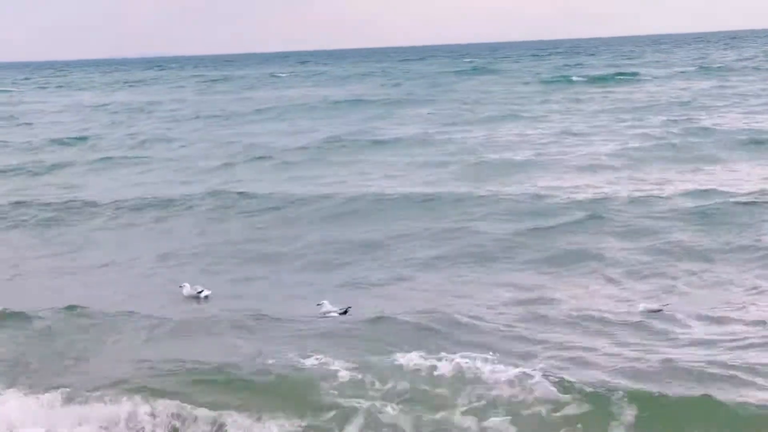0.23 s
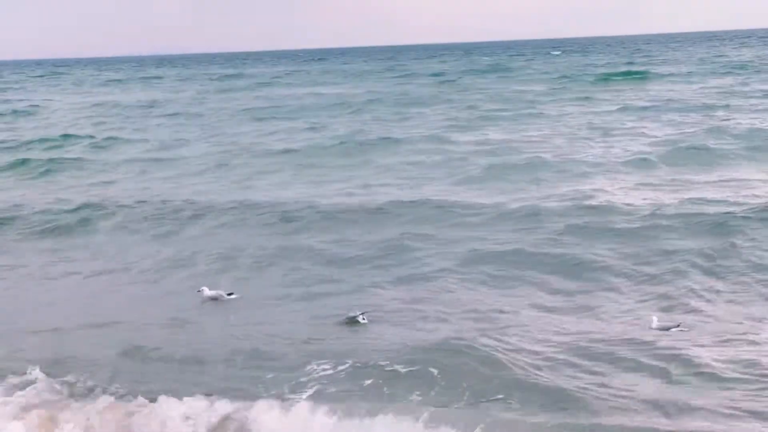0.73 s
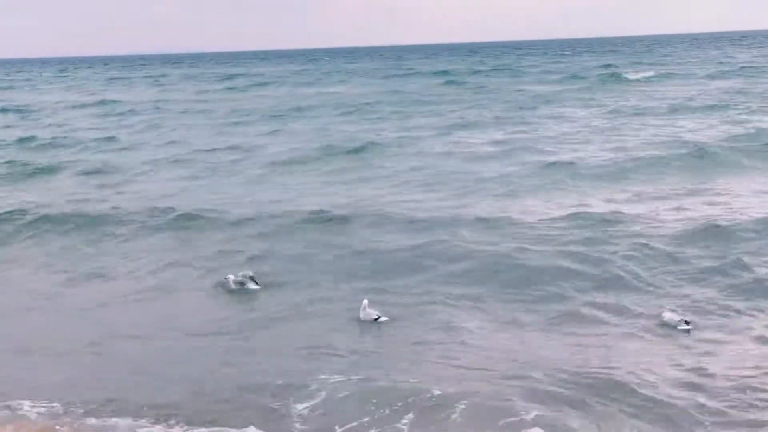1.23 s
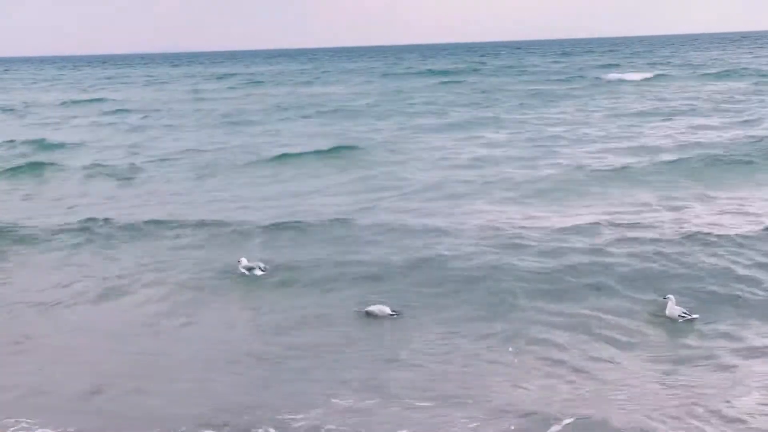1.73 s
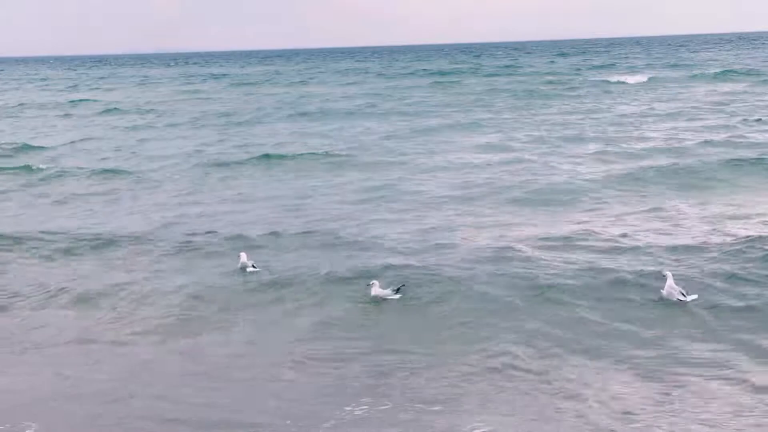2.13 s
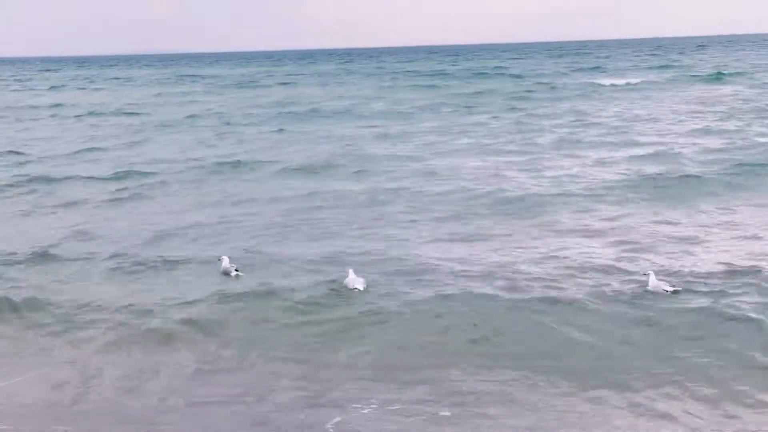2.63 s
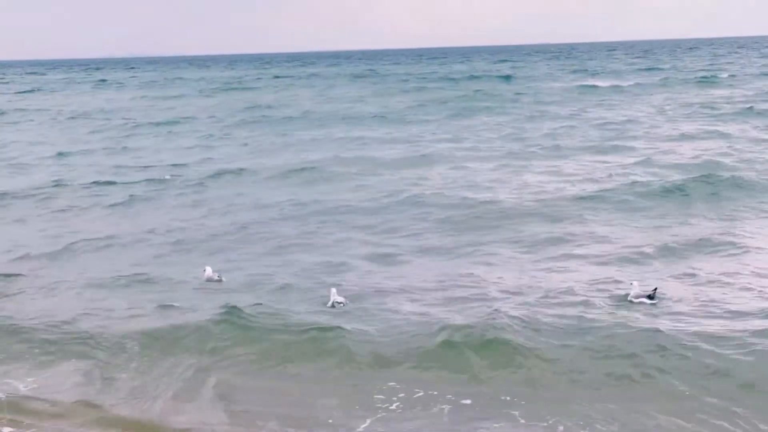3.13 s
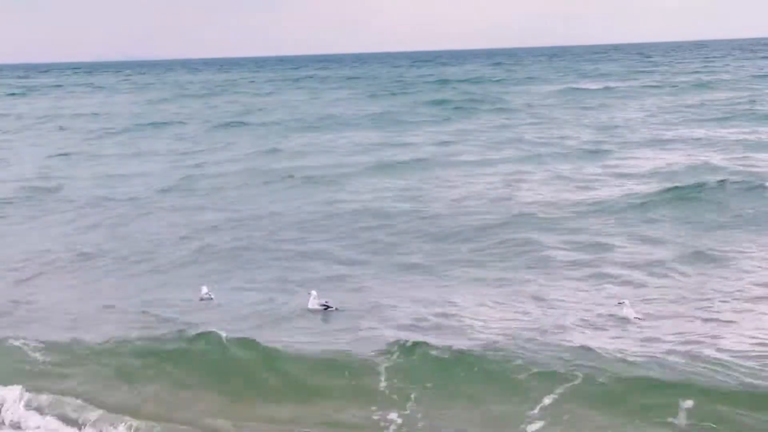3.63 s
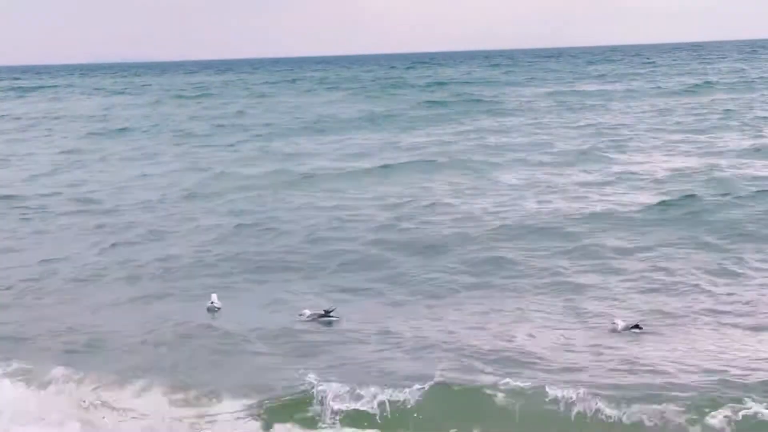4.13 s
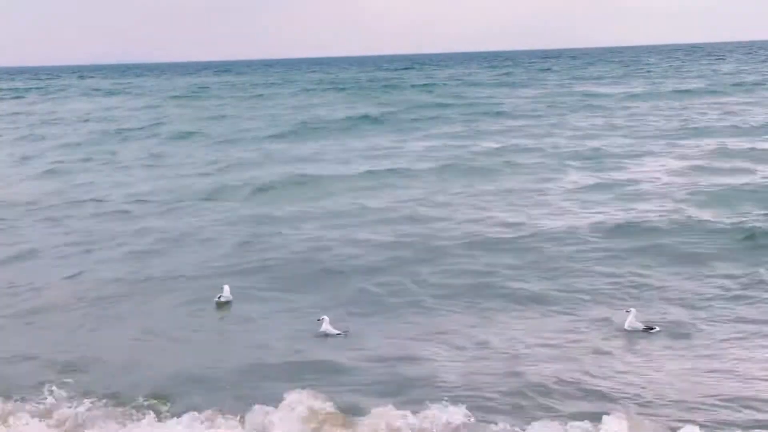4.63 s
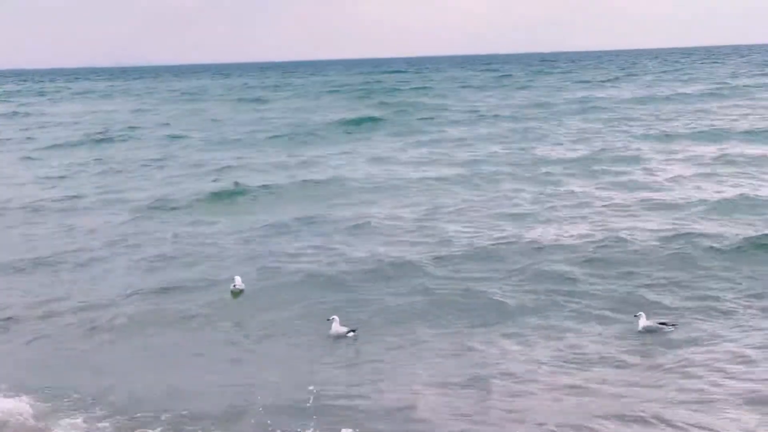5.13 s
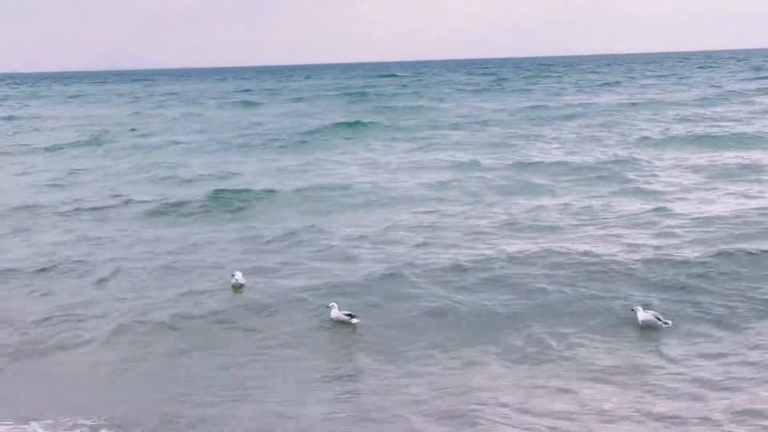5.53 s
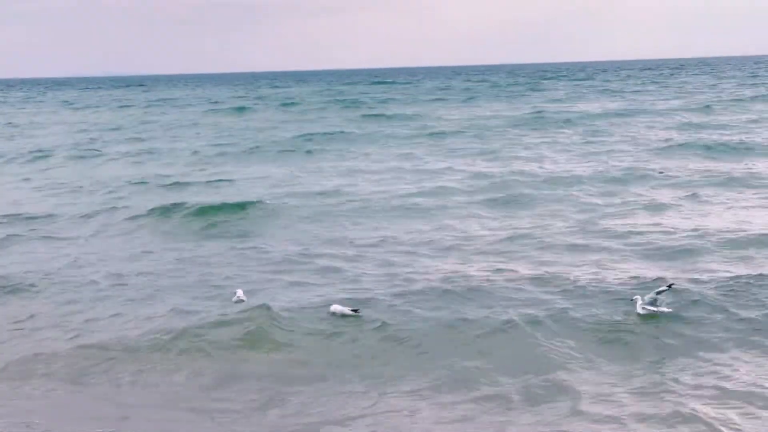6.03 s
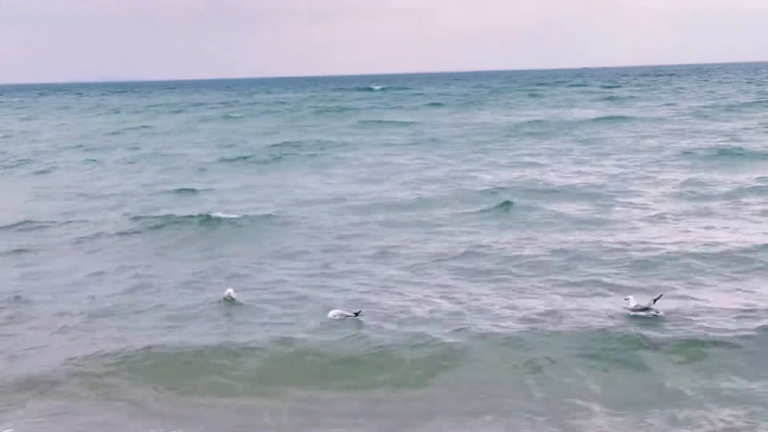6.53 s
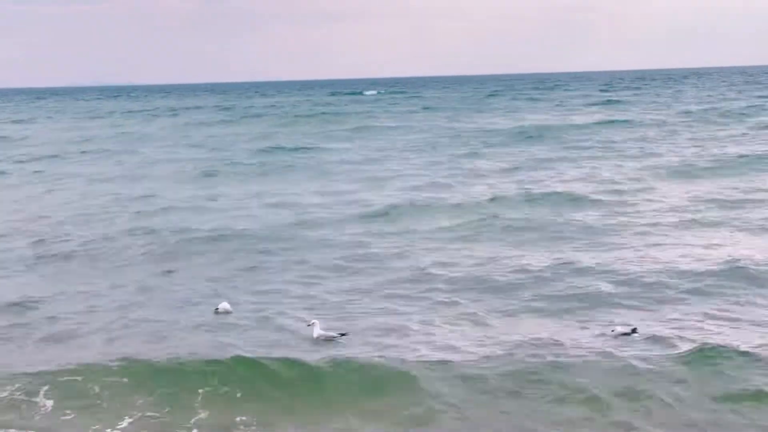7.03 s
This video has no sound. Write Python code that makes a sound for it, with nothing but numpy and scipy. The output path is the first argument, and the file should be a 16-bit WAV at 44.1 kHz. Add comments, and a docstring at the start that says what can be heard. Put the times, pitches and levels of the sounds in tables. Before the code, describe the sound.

On an open beach, gentle surf and faint wind open alone for nearly two seconds. Several gulls then burst into close, overlapping squabbling: nasal barks, rough rasps and thin whistles, loudest around three to four and a half seconds. A long, shrill double-pitched call follows, then scattered cries. Two small waves swell and fizz out underneath. The calls stop and little water slaps finish. Outdoor handheld stereo, dry, with slight low wind buffets.

```python
"""On a beach, gulls squabble close by while two small waves break and wash out.
Gull voices jump between nasal cries (harmonics under a beak resonance), thin near-pure whistles and rasps
(uneven pulses ringing a tight throat); one long call sounds two coupled notes at once.
Surf is banded noise with bursting bubbles, and slaps at the shore are ringing air pockets.
A light wind, low filtered noise, buffets the two microphone ports."""
import sys
import numpy as np
from scipy import signal
from scipy.fft import rfft, irfft
from scipy.io import wavfile
from scipy.ndimage import uniform_filter1d, minimum_filter1d, map_coordinates

SR = 44100
rng = np.random.default_rng(int(sys.argv[2]) if len(sys.argv) > 2 else 0)


def store_pcm(level_fs):
    """Save levels as 16-bit WAV."""
    pcm = np.round(np.clip(level_fs, -1, 1) * 32767).astype(np.int16)
    wavfile.write(sys.argv[1], SR, np.atleast_2d(pcm).T)


N = 321048
T = np.arange(N) / SR
FREQS = np.fft.rfftfreq(N, 1 / SR)


def undb(db):
    """Decibel law: level to amplitude gain."""
    return 10 ** (np.asarray(db) / 20)


def unit(x):
    """Normalisation to rms 1."""
    return x / np.sqrt(np.mean(x ** 2))


def shape(points, hz):
    """Spectral envelope: gain interpolated in dB over log frequency."""
    f, db = np.transpose(points)
    return undb(np.interp(np.log(np.maximum(hz, 1)), np.log(f), db))


def colour(x, points):
    """Linear filtering: the spectrum is multiplied by an envelope."""
    return irfft(rfft(x) * shape(points, FREQS), N)


def curves(table):
    """Interpolation: each column after the first, drawn as straight lines over time."""
    s, *columns = np.transpose(table)
    return [np.interp(T, s, column) for column in columns]


def walk(rate, size=N):
    """Smooth random wander of spread near 1, through `rate` random knots per second."""
    knots = rng.standard_normal(int(size / SR * rate) + 4)
    return map_coordinates(knots, [1 + np.arange(size) / SR * rate], order=2, mode="nearest")


def stereo_noise(side):
    """Partial coherence: two channels share a common noise and an opposed one."""
    mid, apart = rng.standard_normal((2, N))
    return mid + side * apart * np.array([[1], [-1]])


# Wind on the ports. Each row: time in seconds, level in dB before the trim.
WIND_LEVEL = [(0, -42), (0.1, -47.5), (0.3, -47.5), (2.6, -47.5), (3.4, -41), (5, -44.5), (6.4, -52.5),
              (6.85, -38.5), (7.28, -43.5)]
# Sudden buffets. Each row: time of the peak in seconds, level in dB, Gaussian half-width in seconds.
WIND_BUFFETS = [(2.019, -30.5, 0.024), (3.669, -32.5, 0.029), (4.537, -30.5, 0.015), (5.331, -33, 0.011)]
# Spectrum of the turbulence. Each row: frequency in Hz, relative level in dB.
WIND_SPECTRUM = [(20, -29), (50, -0.5), (90, -1), (150, -6.5), (260, -15.5), (600, -38), (2000, -79)]


def wind(side=0.23, flutter_db=3.0, trim_db=-2):
    """Turbulent pressure: low, partly coherent noise at the ports, with a few sharper buffets."""
    level_db, = curves(WIND_LEVEL)
    size = undb(level_db + trim_db + flutter_db * walk(19))
    for s, db, half_width in WIND_BUFFETS:
        size = size + undb(db) * np.exp(-((T - s) / half_width) ** 2)
    return unit(colour(stereo_noise(side), WIND_SPECTRUM)) * size


# The waves. Each row: time in seconds, churning water level in dB, foam hiss level in dB.
SURF_LEVELS = [(0.05, -57, -58.5), (0.3, -54, -53.5), (0.65, -47.5, -47), (0.92, -44.5, -46.5),
               (1.4, -48, -47.5), (1.8, -46.5, -51.5), (2.7, -52, -59.5), (3.3, -48, -58),
               (4.2, -44, -48.5), (5.55, -48, -48.5), (6.1, -46, -57.5), (6.6, -56, -59),
               (7.251, -55, -56.5)]
# Spectrum of the wash. Each row: frequency in Hz, relative level in dB.
WASH_SPECTRUM = [(60, -20.5), (200, -3), (420, -4.5), (660, 0), (1100, -5), (2000, -8), (4500, -13.5),
                 (8800, -15), (10900, -10.5), (12200, -17.5), (14000, -60)]


def surf(flicker_db=2.37, bubble_db=-7, bubble_rate=400, bubble_spread_db=3, low_side=0.36, high_side=0.15):
    """Bubble noise: bands of rushing water and bursts; the lows follow the churn, the highs the foam."""
    churn_db, hiss_db = curves(SURF_LEVELS)
    wash = shape(WASH_SPECTRUM, FREQS)
    # refer the churn level to 200-480 Hz and the hiss level to 5-9 kHz
    churn_db = churn_db - 10 * np.log10(np.mean(wash ** 2 * (FREQS > 200) * (FREQS < 480)))
    hiss_db = hiss_db - 10 * np.log10(np.mean(wash ** 2 * (FREQS > 5000) * (FREQS < 9000)))
    out = np.zeros((2, N))
    for hz in np.geomspace(100, 12800, 15):
        # half-octave spacing; neighbouring bands overlap at constant power
        band = np.cos(np.pi / 2 * np.clip(2 * np.log2((FREQS + 1) / hz), -1, 1))
        foam = np.clip(np.log(hz / 700) / np.log(6.5), 0, 1)
        # bursts per second grow with band frequency: bubble_rate at 700 Hz
        pops = np.zeros(N)
        at = rng.integers(0, N, int(bubble_rate * hz / 700 * N / SR))
        pop_db = bubble_spread_db * np.minimum(rng.exponential(size=len(at)), 5)
        pops[at] = rng.choice([-1, 1], len(at)) * undb(pop_db)
        rush = stereo_noise(low_side + foam * (high_side - low_side))
        water = unit(rush + undb(bubble_db) * unit(pops))
        level_db = churn_db + foam * (hiss_db - churn_db)
        level_db = level_db + flicker_db * (1 - 0.61 * foam) * walk(18)
        out += irfft(rfft(water) * band * wash, N) * undb(level_db)
    return out


# roundness of a crest of effort (1 = pointed); how fast the voice starts and stops, in seconds
CREST_ROUNDNESS, ATTACK_S, RELEASE_S = 1.5, .011, 0.0053


def voiced(start, end):
    """Onset and offset of phonation: the samples a note covers and its soft-edged gate."""
    span = np.flatnonzero((T > start - ATTACK_S) & (T < end + RELEASE_S))
    edge = np.minimum((T[span] - start) / ATTACK_S, (end - T[span]) / RELEASE_S)
    return span, np.sin(np.pi / 4 * (1 + np.clip(edge, -1, 1))) ** 2


def push(start, rise, fall, db, swell_db):
    """Effort sets loudness: samples, gain, and slack (0-1) before and after the crest of one push."""
    span, gate = voiced(start, start + rise + fall)
    since_crest = T[span] - start - rise
    before = np.clip(-since_crest / rise, 0, 1) ** CREST_ROUNDNESS
    after = np.clip(since_crest / fall, 0, 1) ** CREST_ROUNDNESS
    return span, gate * undb(db - swell_db * (before + after)), before, after


def note(start, rise, fall, crest_hz, climb, sag, db, swell_db):
    """Effort sets pitch too, climbing to the crest and sagging after it: samples, gain, pitch in Hz."""
    # a negative share bends the pitch the other way
    span, gain, before, after = push(start, rise, fall, db, swell_db)
    return span, gain, crest_hz * (1 - climb * before - sag * after)


def vibrate(hz, waver, jitter, waver_rate=70, jitter_rate=600):
    """Frequency modulation: phase of a membrane whose pitch wavers slowly and jitters quickly."""
    drift = waver * walk(waver_rate, len(hz)) + jitter * walk(jitter_rate, len(hz))
    return 2 * np.pi * np.cumsum(hz * (1 + drift)) / SR


# Nasal cries. Each row: start in seconds, rise in seconds, fall in seconds, crest pitch in Hz, share of
# pitch climbed, share lost after the crest, crest level in dB, swell in dB, beak resonance in Hz.
CRY_NOTES = [ (1.745, 0.011, 0.038, 707, 0, 0.21, -41.5, 0, 1500),
             (1.796, .018, 0.05, 707, 0.058, 0.09, -26, 4.5, 2420),
             (1.86, .006, 0.09, 620, 0.0031, .047, -32.5, 13, 2780),
             (1.95, 0.19, .019, 541, 0.16, 0.014, -26, 11, 2050),
             (1.982, .035, .1, 726, 0.081, 0.1, -34.5, 4, 3100),
             (2.16, 0.05, 0.093, 591, 0.056, 0.043, -17.5, 7.5, 2160),
             (2.174, .087, 0.043, 530, 0.011, 0.045, -21, 13, 2730),
             (2.29, 0.063, 0.17, 596, .03, -0.036, -27, 6, 1800),
             (2.879, 0.059, 0.056, 565.5, .3, 0.0055, -23.5, 3, 1880),
             (2.89, 0.049, .25, 323, 0.078, 0.12, -36, -4, 800),
             (2.977, 0.065, 0.017, 603.5, 0.039, 0.056, -17.5, 11, 2040),
             (3.08, 0.049, .07, 472, .02, .04, -46, -0.5, 900),
             (3.262, 0.031, .045, 564, .05, .06, -32, 11, 2060),
             (3.388, 0.02, 0.037, 610, -0.017, 0.024, -18, 9, 1630),
             (3.433, 0.014, 0.051, 1336, 0.11, 0.046, -17.5, -2.5, 1830),
             (3.485, .005, 0.019, 632, 0, 0.13, -15, 4, 1610),
             (3.51, .088, .02, 488, 0.23, 0, -33.5, -2, 950),
             (3.539, 0.049, 0.016, 638, 0.11, -0.091, -15, 21, 1750),
             (3.606, .053, 0.075, 678, -.059, .15, -12, 10, 1976),
             (3.654, 0.088, 0.01, 594, 0.033, 0.1, -14.5, 4, 2090),
             (3.73, 0.063, 0.08, 561, -0.12, 0.0068, -21, 1.5, 1490),
             (3.924, 0.012, 0.036, 599, -0.08, 0.038, -15.5, 4, 1980),
             (3.968, 0.035, 0.016, 619, 0.11, 0.098, -8.5, 8.5, 1810),
             (4.145, 0.074, .008, 621, .14, .058, -17.5, 13, 2230),
             (4.213, 0.039, 0.014, 641, -0.025, 0.1, -11, 6.5, 2070),
             (4.274, 0.101, .022, 534, .088, -.023, -36, 3, 1650),
             (4.412, 0.03, 0.013, 388, 0.1, 0.0049, -18.5, 20, 1790),
             (4.46, 0.0062, 0.048, 648, -0.065, .12, -18.5, 4, 2080),
             (4.49, 0.038, 0.026, 651, -0.022, 0.21, -14, 13, 1700),
             (5.457, 0.072, .014, 538, 0.056, -0.059, -25, 11, 1600),
             (5.656, 0.0027, 0.02, 477, 0.033, 0.26, -29.5, 13, 1400),
             (5.758, .028, 0.052, 360, -0.062, 0.074, -31, 11, 1670),
             (5.872, .069, 0.023, 731, 0.083, -0.014, -16.5, 5.5, 2124),
             (5.991, 0.026, 0.049, 588, -0.12, -0.12, -23.5, 11, 1740),
             (6.113, 0.041, .047, 611, 0.085, 0.15, -22.5, 12.5, 1430),
             (6.24, 0.041, .04, 478, .02, 0.064, -29, 1, 1900),
             (6.315, 0.03, 0.055, 473, .03, 0.071, -25.5, 20, 1900),
             (6.463, 0.0052, 0.096, 422, 0.023, -0.1, -39, 9, 1270)]
# A gull's throat. Each row: frequency in Hz, relative level in dB.
THROAT_SPECTRUM = [(330, -29), (560, -8.5), (850, -6), (1250, -2.5), (1800, 2.5), (2400, 2.5), (3000, 0),
                   (3300, -7), (3700, -5.5), (4200, -14), (4600, -56)]


def cries(beak_width_hz=260, direct=0.21, doubling=0.11, shimmer_db=2.12, count=12):
    """Source and filter: whichever harmonic meets the beak resonance leaps out."""
    out, k = np.zeros(N), np.arange(1, count + 1)[:, None]
    for *row, beak_hz in CRY_NOTES:
        span, gain, hz = note(*row)
        beak = direct + 1 / (1 + 2j * (k * hz - beak_hz) / beak_width_hz)
        partials = shape(THROAT_SPECTRUM, k * hz) * beak
        partials /= np.sqrt(np.sum(abs(partials) ** 2, axis=0) / 2)
        phase = vibrate(hz, waver=.003, jitter=.005)
        voice = np.sum(partials * np.exp(1j * k * phase), axis=0).real
        # in fits, strong and weak cycles alternate and put lines between the harmonics
        voice *= 1 + doubling * walk(33.4, len(span)) * np.cos(phase / 2)
        out[span] += voice * gain * undb(shimmer_db * walk(218.1, len(span)))
    return out


# Rasps. Each row: start in seconds, rise in seconds, fall in seconds, crest level in dB before the trim,
# swell in dB.
RASP_PUSHES = [ (1.964, 0.025, 0.18, -30, 3), (2.253, 0.066, 0.29, -20.5, 2), (2.594, .053, .079, -37, 7),
               (2.714, .014, 0.015, -13.5, 13), (2.859, 0.013, 0.39, -29.5, 5),
               (3.183, .07, 0.0083, -16.5, 6), (3.345, 0.018, .1, -21, 6), (3.484, .019, 0.1, -30, -4),
               (3.608, 0.12, 0.042, -17.5, -0.5), (3.86, 0.15, 0.019, -16, 5), (4.13, .13, .011, -18, 4.5),
               (4.39, 0.13, 0.036, -21.5, 11), (4.56, 0.13, .55, -33.5, 7.5), (5.19, .065, 0.021, -24.5, 3),
               (5.429, 0.038, 0.095, -31, 8), (5.75, 0.014, .09, -31, 4.5), (5.839, 0.058, 0.19, -21, 8.5),
               (6.056, 0.28, 0.071, -30.5, 1.5)]
# The throat squeezed for a rasp. Each row: frequency in Hz, relative level in dB.
TIGHT_THROAT_SPECTRUM = [(300, -35), (600, -18), (1000, -11.5), (1400, -6), (1750, 1), (2350, 2),
                         (2650, -4), (3000, -2), (3300, -10.5), (3700, -12.5), (4250, -21.5), (4600, -60)]


def resonate(x, hz, width_hz):
    """A single resonance, gain 1 at its centre."""
    return signal.lfilter(*signal.iirpeak(hz, hz / width_hz, fs=SR), x)


def rasp(pulse_hz=350, lurch=.18, jitter=.07, scatter_db=1.5, flutter_db=4.5,
         beak_hz=1920, beak_width_hz=1100, trim_db=-1):
    """Impulse excitation: membranes slap at a lurching rate, and each slap rings the tight throat."""
    rate_hz = pulse_hz * np.exp(lurch * walk(70) + jitter * walk(350))
    turns = np.cumsum(rate_hz) / SR
    slap_size = undb(scatter_db * walk(400) + flutter_db * walk(60))
    pulses = np.diff(np.floor(turns), prepend=0) * slap_size
    voice = resonate(colour(pulses, TIGHT_THROAT_SPECTRUM), beak_hz, beak_width_hz)
    power = np.zeros(N)
    for row in RASP_PUSHES:
        span, gain, _, _ = push(*row)
        power[span] += gain ** 2
    # level the ringing over about 34 ms, then give it the power of the pushes
    running_power = uniform_filter1d(voice ** 2, size=1500) + 1e-12
    return voice * np.sqrt(power / running_power) * undb(trim_db)


# Opening of the beak: a wide gape lets the top of the voice out.
# Each row: time in seconds, gain of the treble in dB.
GAPE_TREBLE = [(1.85, 4), (2.22, -8), (2.35, -15), (3.2, -17), (3.44, -4.5), (3.65, -0.5), (4.5, 7),
               (6.1, 5.5), (6.4, -5.5)]


def gape(voice, edge_hz=2750):
    """Radiation from an aperture: treble swells and shrinks with the opening of the beak."""
    highpass = signal.butter(4, edge_hz, "high", fs=SR, output="sos")
    treble = signal.sosfiltfilt(highpass, voice)
    treble_db, = curves(GAPE_TREBLE)
    return voice + treble * (undb(treble_db) - 1)


# Whistled notes. Each row: start in seconds, rise in seconds, fall in seconds, crest pitch in Hz, share of
# pitch climbed, share lost after the crest, crest level in dB, swell in dB, overtone boost in dB.
WHISTLE_NOTES = [ (2.245, 0.42, .025, 1383, 0.035, -.02, -26, 4.5, -4),
                 (2.584, 0.11, .028, 1325, 0.036, 0.085, -21, 4, 0.5),
                 (3.046, .15, .04, 1385, .058, -.015, -18.5, 4, -5),
                 (3.193, 0.039, .021, 1726, -0.014, 0.095, -6.5, 8.5, 1.5),
                 (5.296, 0.048, .032, 1758, 0.05, -0.026, -31.5, 11, -3),
                 (5.488, 0.13, 0.056, 2289, 0.11, .087, -20, 12, 0),
                 (5.607, 0.043, 0.065, 2670, 0.0075, 0.017, -39.5, 1, 0),
                 (5.934, 0.058, 0.025, 1403, -0.086, 0.055, -18, 10.5, 3),
                 (6.542, 0.12, .06, 1396, .02, 0.0013, -37, 5.5, 7)]
# How overtones get through the throat. Each row: frequency in Hz, level in dB re the note before the boost.
OVERTONE_SPECTRUM = [(2550, -4), (2800, -19.5), (3150, -47), (3950, -28.5), (4600, -54)]


def whistles(shimmer_db=0.84):
    """High register: a nearly sinusoidal vibration with its second and third harmonics."""
    out = np.zeros(N)
    for *row, boost_db in WHISTLE_NOTES:
        span, gain, hz = note(*row)
        phase = vibrate(hz, waver=0.0033, jitter=0.0067)
        overtones = sum(shape(OVERTONE_SPECTRUM, k * hz) * np.sin(k * phase) for k in (2, 3))
        voice = np.sin(phase) + undb(boost_db) * overtones
        out[span] += np.sqrt(2) * voice * gain * undb(shimmer_db * walk(120, len(span)))
    return out


# The long two-note call. Each row: time in seconds, low pitch in Hz, low level in dB, high pitch in Hz,
# high level in dB.
DUET_TRACK = [(4.376, 1652, -28, 2200, -32), (4.41, 1587, -18, 2162, -34), (4.559, 1618, -19.5, 2365, -47),
              (4.625, 1650, -20.5, 2307, -36), (4.649, 1603, -30.5, 2248, -22.5),
              (4.72, 1644, -22, 2350, -32.5), (4.8, 1610, -26, 2287, -20.5), (4.9, 1606, -39, 2245, -21),
              (5.071, 1640, -26.5, 2285, -18), (5.215, 1710, -27, 2363, -20),
              (5.245, 1652, -27, 2300, -18.5), (5.269, 1545, -25, 2050, -25)]


def duet(sum_db=-23, upper_db=-15, lower_db=-13, shimmer_db=0.8, flutter_db=2.5):
    """Nonlinear coupling: both sides of the syrinx sing at once, adding sum and difference tones."""
    out = np.zeros(N)
    span, gate = voiced(DUET_TRACK[0][0], DUET_TRACK[-1][0])
    low_hz, low_db, high_hz, high_db = (curve[span] for curve in curves(DUET_TRACK))
    # the low side is pulled about when the high one is stronger
    weak = np.clip(.5 + (high_db - low_db) / 20, 0, 1)
    low = vibrate(low_hz, waver=.003 + .008 * weak, jitter=.005 + .014 * weak)
    high = vibrate(high_hz, waver=0.0016, jitter=0.0049)
    low_size = undb(low_db + (shimmer_db + flutter_db * weak) * walk(170, len(span)))
    high_size = undb(high_db + shimmer_db * walk(89.8, len(span)))
    mixed = undb(sum_db) * np.sin(low + high)
    mixed += undb(upper_db) * np.sin(2 * high - low)
    mixed += undb(lower_db) * np.sin(2 * (high - low))
    voice = low_size * np.sin(low) + high_size * np.sin(high)
    voice += np.sqrt(low_size * high_size) * mixed
    out[span] = np.sqrt(2) * gate * voice
    return out


# Water slapping at the shore. Each row: start in seconds, peak level in dB, starting pitch in Hz.
SHORE_SLAPS = [(6.764, -33, 705), (6.847, -33, 681), (6.934, -34, 600), (7.077, -33, 710),
               (7.215, -31.5, 600)]


def slaps(t60_s=0.022, splash_db=-13, glide=4):
    """Bubble resonance: a trapped air pocket rings and rises in pitch under a short splash."""
    out, t = np.zeros(N), T[:SR // 20]
    for s, db, hz in SHORE_SLAPS:
        # the pitch gains 2 * glide times its starting value per second
        pocket = np.sin(2 * np.pi * hz * t * (1 + glide * t))
        splash = undb(splash_db) * rng.standard_normal(len(t))
        decay = undb(db - 60 * t / t60_s)
        i = int(s * SR)
        out[i:i + len(t)] += ((pocket + splash) * decay)[:N - i]
    return out


def scene():
    """Superposition: gulls straight ahead in the open air, over water and wind."""
    return wind() + surf() + gape(cries() + rasp()) + whistles() + duet() + slaps()


def limit(x, ceiling=0.99):
    """Gain control: the level is turned down smoothly around any peak above the ceiling."""
    room = np.minimum(1, ceiling / (abs(x).max(axis=0) + 1e-9))
    return x * uniform_filter1d(minimum_filter1d(room, size=260), size=260)


# The two ports ring at slightly different pitches.
# Each row: frequency in Hz, phase by which left leads right in radians.
PORT_LEAD = [(0, 0), (8700, 0), (9220, -1.3), (10300, -3.14), (11800, -6.28)]
TOP_HZ = 13100


def record(dry):
    """Phase response: the ports turn the top treble out of phase; peaks are limited and the top is cut."""
    lead = np.interp(FREQS, *np.transpose(PORT_LEAD))
    ports = irfft(rfft(dry) * np.exp(1j * lead * np.array([[.5], [-.5]])), N)
    lowpass = signal.ellip(8, .2, 70, TOP_HZ, fs=SR, output="sos")
    return signal.sosfilt(lowpass, limit(ports))


dry = scene()
out = record(dry)
store_pcm(out)
```